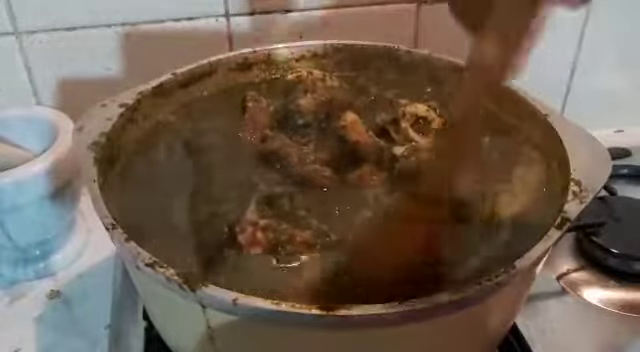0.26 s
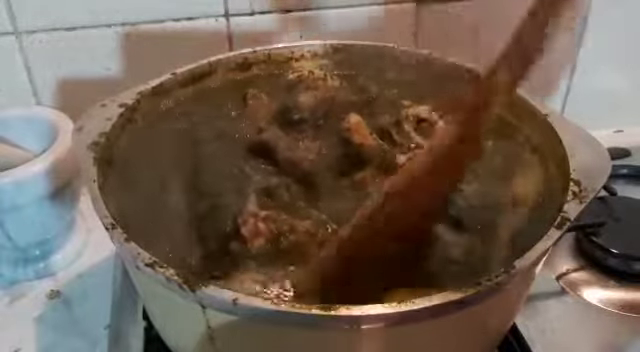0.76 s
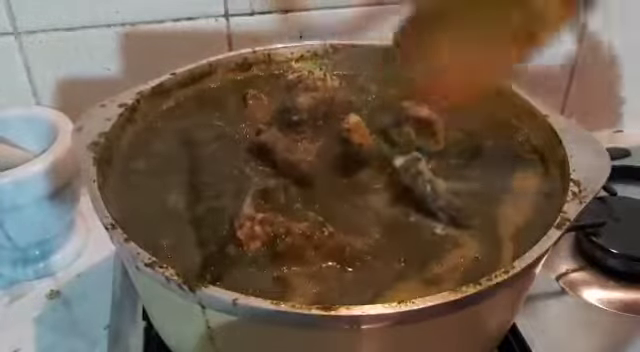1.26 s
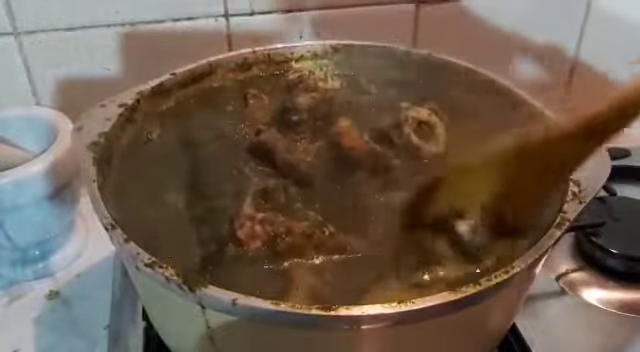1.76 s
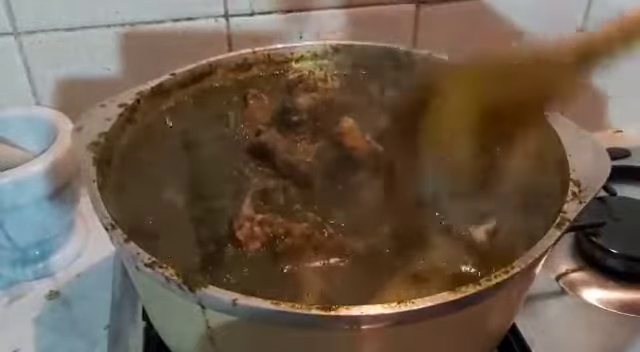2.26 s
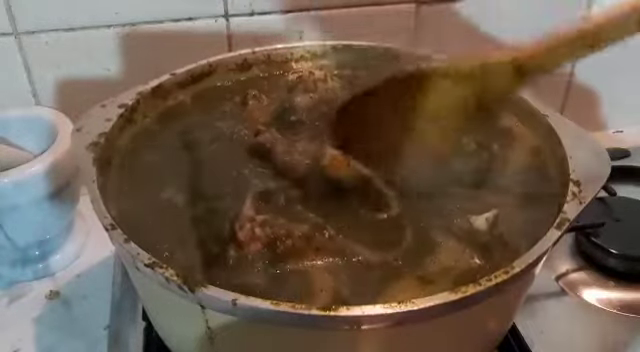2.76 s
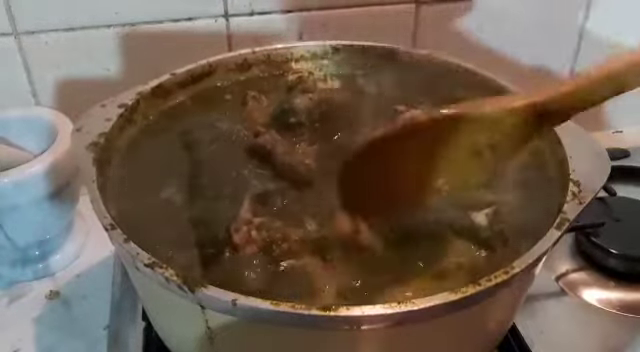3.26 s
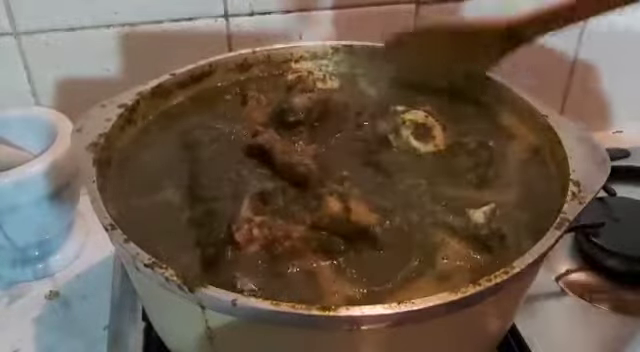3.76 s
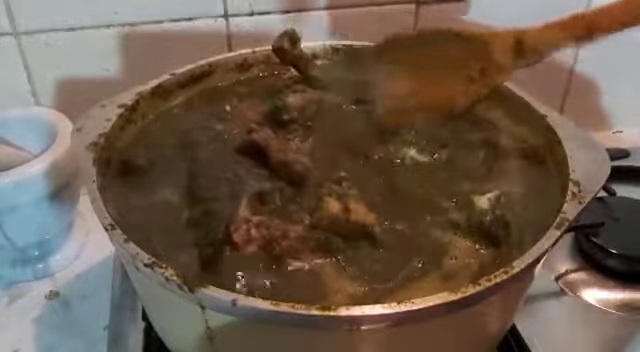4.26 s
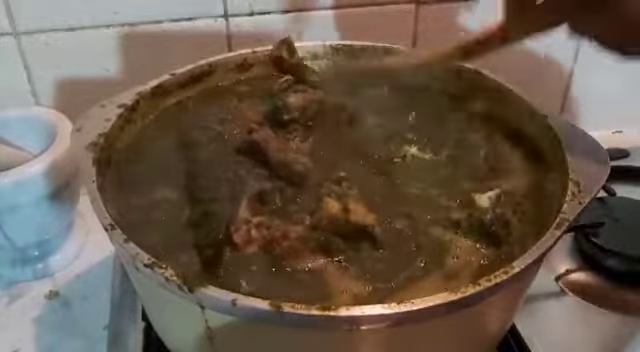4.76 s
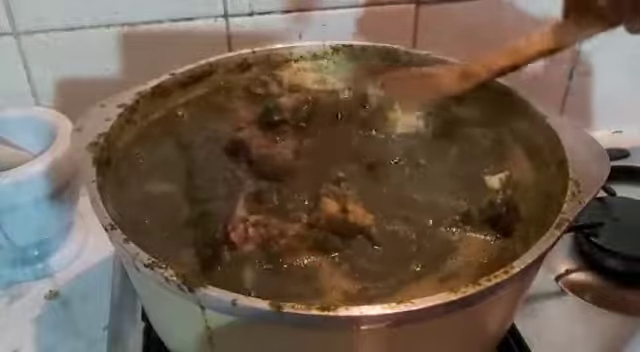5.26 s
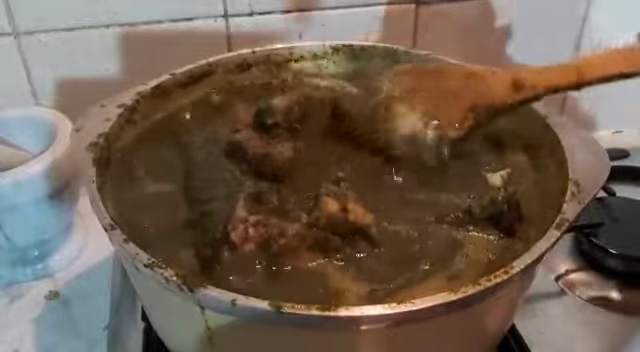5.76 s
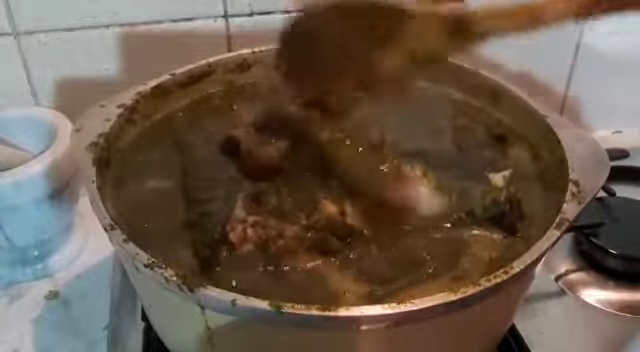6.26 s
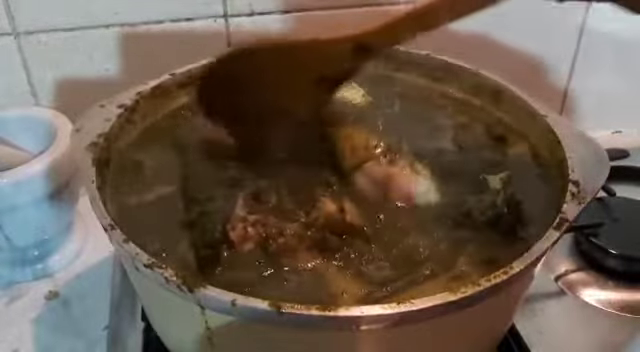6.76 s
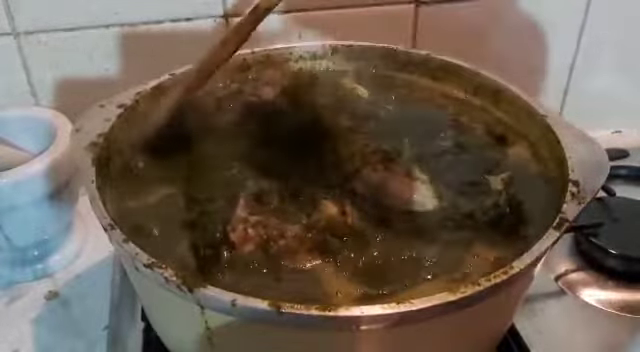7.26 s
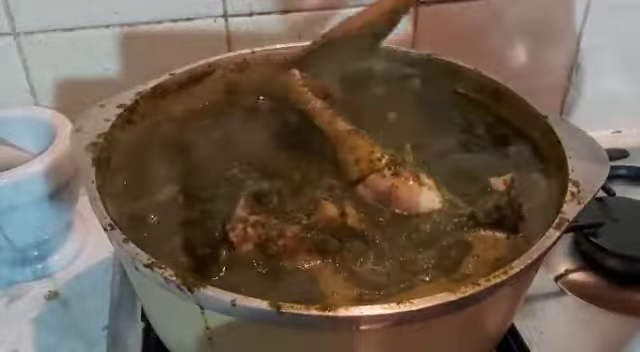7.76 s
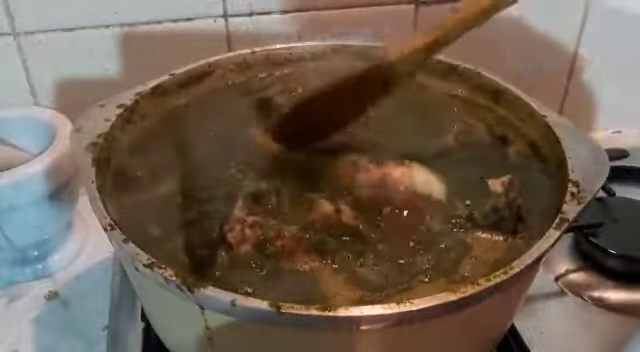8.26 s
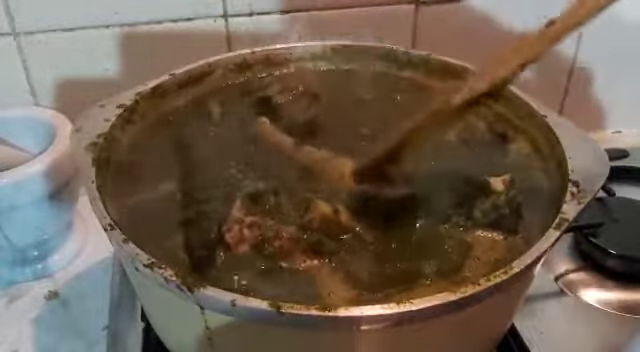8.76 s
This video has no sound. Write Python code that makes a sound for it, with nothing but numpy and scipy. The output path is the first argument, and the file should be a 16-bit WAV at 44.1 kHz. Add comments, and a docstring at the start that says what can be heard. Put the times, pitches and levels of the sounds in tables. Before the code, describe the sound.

Close stereo sound of a large metal pot of thick soup on a gas burner in a small tiled kitchen. Flame roar, jet hiss and fine simmering run throughout. A wooden spoon shifts the meat, bringing scattered plops, a run of them near 2.5 seconds and the loudest wet smack at 4.3. It calms after 5 seconds, then plops and spatter return near 7.4.

```python
"""Close to a big metal pot of thick soup on a gas burner in a tiled kitchen, heard by a left and a right microphone.
From the start to the end, shaped noise makes the flame's roar and the jet's hiss; swarms of tiny rings make the simmer.
A spoon pushes the meat about; near 2.5 s the broth, washing in dense grains, gives a run of plops (damped rings).
The loudest smack (a filtered click) and plop come at 4.3 s; after 5 s it is calmer, with low glugs and droplets.
From 7.4 s to the end smacks, plops and spatter return; the air above the soup rings between the pot walls."""
import sys
import numpy as np
from scipy import signal
from scipy.fft import rfft, irfft, next_fast_len
from scipy.io import wavfile
from scipy.ndimage import map_coordinates

SR = 44100
rng = np.random.default_rng(int(sys.argv[2]) if len(sys.argv) > 2 else 0)


def inscribe(sig):
    """Save sig as 16-bit PCM at rate SR to the path in sys.argv[1].

    A 1-D sig is mono; a 2-D sig holds one channel per row.
    Samples are clipped to [-1, 1] before scaling.
    """
    pcm = np.round(np.clip(np.atleast_2d(sig).T, -1, 1) * 32767)
    wavfile.write(sys.argv[1], SR, pcm.astype(np.int16))


N = 397782
T = np.arange(SR // 6) / SR  # seconds within one short event


def amp(db):
    """Decibels to gain."""
    return 10 ** (np.asarray(db) / 20)


def unit(x):
    """Scaled to rms 1."""
    return x / np.sqrt(np.mean(x ** 2) + 1e-20)


def along(points, hz):
    """(Hz, value) points read on a log frequency axis."""
    f, v = np.transpose(points)
    return np.interp(np.log(hz + 1), np.log(f + 1), v)


def curves(rows):
    """One value per sample for each column after the time."""
    s, *cols = np.transpose(rows)
    return [np.interp(np.arange(N) / SR, s, c) for c in cols]


def wobble(rate):
    """A smooth random curve, rate knots a second."""
    knots = rng.standard_normal(int(N * rate / SR) + 4)
    return map_coordinates(knots, [np.arange(N) * rate / SR])


def filtered(x, response):
    """x times a complex response of frequency."""
    m = next_fast_len(N + SR // 2)
    return irfft(rfft(x, m) * response(np.fft.rfftfreq(m, 1 / SR)), m)[..., :N]


def resonances(modes, f):
    """Causal response of (Hz, width Hz, dB) modes."""
    return sum(amp(db) * 1j * f * w / (c * c - f * f + 1j * f * w) for c, w, db in modes)


def add(track, s, sound):
    """Mix a sound into the track at time s."""
    part = track[max(round(s * SR), 0):][:len(sound)]
    part += sound[:len(part)]


def rush(colour):
    """Stereo noise of rms 1, nearly mono in the bass; sharing mid and side noise sets the likeness."""
    # How alike the two microphones hear it. Each row: frequency in Hz, left-right likeness (1 is mono).
    likeness = [(60, 0.95), (160, 0.95), (300, 0.87), (450, 0.7), (750, 0.14), (1300, 0.12), (2200, 0.07),
                (4400, 1), (7000, 0.23), (11000, 0.067), (14000, 0.067), (15500, 1)]

    def shape(hz):
        turn = np.arccos(np.clip(along(likeness, hz), 0, 1)) / 2
        return colour(hz) * np.array([np.cos(turn), np.sin(turn)])

    mid, side = filtered(rng.standard_normal((2, N)), shape)
    return unit(np.array([mid + side, mid - side]))


def bubble(hz, t60, rise, onset):
    """A pocket of gas rings and climbs in pitch around hz; it swells over onset cycles to peak 1."""
    pitch = hz * (1 + rise * (1 - np.exp(-3 * T / t60)) - rise / 2)
    decay = amp(-60 * T / t60)
    swell = 1 - np.exp(-T * hz / onset)
    ring = np.sin(2 * np.pi * np.cumsum(pitch) / SR) * decay * swell
    return ring / np.abs(ring).max()


def snap(low_hz, high_hz):
    """A liquid film parts: one band-limited click of peak 1."""
    low = signal.butter(3, low_hz, "high", fs=SR, output="sos")
    high = signal.butter(12, min(high_hz, SR / 3), fs=SR, output="sos")
    click = signal.sosfilt(np.vstack([low, high]), 1. * (T == 0))
    return click / np.abs(click).max()


def grains(rate, hz, spread, cycles, scatter_db):
    """A random swarm of tiny damped bubbles, rms 1: rate a second, spread octaves either side of hz."""
    u = rng.random((int(rate * N / SR), 3))
    starts = (u[:, :1] * N).astype(int)
    pitch = hz * 2 ** (spread * (2 * u[:, 1:2] - 1))
    size = amp(scatter_db * np.minimum(-np.log(1 - u[:, 2:]), 3))  # many small, few large
    n = np.arange(SR // 40)
    age = pitch * n / SR  # in cycles
    decay = np.exp(-np.log(1000) * age / cycles)  # down 60 dB after this many cycles
    rings = size * np.sin(2 * np.pi * age) * decay * (1 - np.exp(-2 * age))
    return unit(np.bincount((starts + n).ravel(), rings.ravel(), N)[:N])


def stirring(pushes):
    """Power of the spoon's motion: each push swells and fades as a bell."""
    t = np.arange(N) / SR
    return sum(amp(db) ** 2 * np.exp(-np.pi * (2 * (t - s) / length) ** 2 / 2) for s, length, db in pushes)


def placed(x, lead_s):
    """The sound reaches the left microphone first, by lead_s seconds."""
    return filtered(x, lambda hz: np.exp(1j * np.pi * hz * lead_s * np.array([[1], [-1]])))


def kitchen(x, wall_db, wall_t60, room_db):
    """Direct sound, a quick scatter from hob and tiles, and a room tail, as decaying noise redrawn each quarter second."""
    # Decay of the tiled room. Each row: frequency in Hz, time to fall 60 dB in seconds.
    room_t60 = [(150, 0.097), (1200, 0.14), (4000, 0.2), (12000, 0.0016)]
    out = np.zeros((2, N + SR))
    hop = SR // 4
    for start in range(0, N, hop):
        hz, t, z = signal.stft(rng.standard_normal((2, 2, SR // 3)), SR, nperseg=128)
        near = signal.istft(z[0] * amp(-60 * t / wall_t60), nperseg=128)[1]
        far = signal.istft(z[1] * amp(-60 * t / along(room_t60, hz)[:, None]), nperseg=128)[1]
        near = near + near[::-1] / 2  # near walls reach both microphones much alike
        scatter = amp(wall_db) * near / np.linalg.norm(near[0])
        tail = scatter + amp(room_db) * far / np.linalg.norm(far[0])
        echo = signal.fftconvolve(x[None, start:start + hop], tail, axes=1)
        out[:, start + SR // 300:][:, :echo.shape[1]] += echo
    return x + out[:, :N]


def pot(x, ring_db):
    """The air between the pot walls rings on as damped modes; hob and tiles throw the sound back."""
    # Air above the soup. Each row: frequency in Hz, width in Hz, level in dB relative to ring_db.
    air_modes = [(310, 39, -17), (674.6, 15, 15), (742, 14, 6.5), (899, 55, 6.5), (1098, 36, 7.5),
                 (1266, 260, 1.5), (1467, 64, -3.5)]
    # Reflections from the hob and the tiled wall. Each row: delay in seconds, level in dB.
    reflections = [(.0034, -18), (.0084, -21.5)]

    def response(f):
        ringing = 1 + amp(ring_db) * resonances(air_modes, f)
        echoes = 1 + sum(amp(db) * np.exp(-2j * np.pi * f * delay) for delay, db in reflections)
        return ringing * echoes

    return filtered(x, response)


def burner():
    """The flame roars under the pot; gas hisses and whistles unsteadily through the jet: all shaped noise."""
    # Colour of the flame's roar. Each row: frequency in Hz, relative density in dB per Hz.
    roar_colour = [(100, -9.5), (132, 0.5), (185, -5.5), (250, -1.5), (310, 3), (375, -0.5), (440, -9.5),
                   (520, -11), (640, -30), (1000, -16), (2000, -24), (3000, -86)]
    # Gas rushing out of the jet. Each row: frequency in Hz, relative density in dB per Hz.
    hiss_colour = [(1800, -30), (2500, -14.5), (3250, -15), (4300, 0.5), (4900, -0.5), (5600, -10),
                   (6900, 2), (8400, -8), (9100, -5.5), (9800, -10.5), (10500, -4), (11100, -10),
                   (13000, -10), (13400, 0), (14300, -6.5), (15800, 2)]
    # Resonances of the gas jet. Each row: frequency in Hz, width in Hz, relative level in dB.
    nozzle_modes = [(6900, 420, 8), (7005, 60, 8), (7295, 60, 2), (7604, 70, 1), (13838, 110, 10)]
    # Ragged top of the jet's sound. Each row: frequency in Hz, relative density in dB per Hz.
    whistle_colour = [(14300, -30), (15000, -13), (15350, -6), (15580, 0), (15750, -6), (15900, -20)]
    # Course of the whistle. Each row: time in seconds, level in dB before its wobble.
    whistle_course = [(0.0, -59.5), (2.6, -56), (2.7, -61), (4.8, -55), (6.2, -59), (8.25, -56.5),
                      (8.35, -58), (9.02, -56)]
    roar_db, hiss_db = -50.7, -50.5  # middle levels, around which they wobble
    whistle_db, = curves(whistle_course)
    roar = amp(roar_db + 1.3 * wobble(5)) * rush(lambda hz: amp(along(roar_colour, hz)))

    def jet(hz):
        return np.hypot(amp(along(hiss_colour, hz)), abs(resonances(nozzle_modes, hz)))

    hiss = amp(hiss_db + 1.14 * wobble(40)) * rush(jet)
    whistle = amp(whistle_db + 1.4 * wobble(31)) * rush(lambda hz: amp(along(whistle_colour, hz)))
    return roar + placed(hiss, lead_s=.00005) + placed(whistle, lead_s=.000008)


def simmer():
    """Small bubbles keep breaking all over the soup, louder where the spoon stirs; the mass gurgles and heaves."""
    # Pushes of the spoon. Each row: height of the push in seconds, length in seconds, strength in dB.
    strokes = [(0.472, 0.34, -7.5), (0.79, 0.21, 0.5), (1.107, 0.25, 0.5), (1.392, 0.037, -2), (2.0, 1, -4),
               (2.554, 0.68, 2.5), (2.948, 0.56, -1.5), (3.4, 0.29, -1), (3.87, 0.18, 5), (4.113, 0.056, 1),
               (4.34, 0.18, 4), (4.763, 0.19, 2.5), (4.99, 0.065, 0), (6.224, 0.18, -18), (8.18, 0.38, 0)]
    # Colour of the froth. Each row: frequency in Hz, relative density in dB per Hz.
    froth_colour = [(300, -38), (450, -1.5), (520, -4.5), (600, -12), (668, 7), (720, -14), (790, 3.5),
                    (940, -13), (1030, -9), (1090, 1), (1150, -6.5), (1470, 4), (1670, -14), (1890, 3),
                    (2600, -7.5), (3300, -15)]
    # Colour of the low heaving. Each row: frequency in Hz, relative density in dB per Hz.
    heave_colour = [(13, -60), (24, -31), (40, -23), (59, 7), (102, 2), (135, 6.5), (194, -9), (220, -7.5),
                    (290, 3), (480, -120)]
    # Gains in dB ahead of the layer mix: soup left alone, and added by a push of 0 dB
    simmer_rest_db, simmer_push_db = -56, -57
    heave_rest_db, heave_push_db = -59, -50.5
    settle_db_per_s = 0.14  # the soup left alone slowly calms
    push = np.sqrt(stirring(strokes))
    resting = amp(simmer_rest_db - settle_db_per_s * np.arange(N) / SR)
    bubbling = np.hypot(resting, amp(simmer_push_db) * push)
    heaving = np.hypot(amp(heave_rest_db + 0.36 * wobble(3.4)), amp(heave_push_db) * push)

    swarm = pot(grains(rate=210, hz=962, spread=0.97, cycles=10.0, scatter_db=3.5), ring_db=-1.5)
    swarm = filtered(swarm, lambda hz: amp(along([(500, 4.5), (1000, 0.0), (1900, 10.0), (2700, -44)], hz)))
    swarm = unit(kitchen(swarm, wall_db=-2, wall_t60=0.04, room_db=-3))
    # middle-sized bubbles
    blips = grains(rate=50, hz=940, spread=0.83, cycles=16.0, scatter_db=0.0)
    blips = unit(kitchen(blips, wall_db=-5, wall_t60=0.05, room_db=-7))
    gurgle = grains(rate=70, hz=222, spread=0.84, cycles=6, scatter_db=2.5)
    gurgle = unit(kitchen(gurgle, wall_db=-6, wall_t60=0.026, room_db=-20))
    froth = rush(lambda hz: amp(along(froth_colour, hz)))
    heave = rush(lambda hz: amp(along(heave_colour, hz)))

    surface = amp(-3.8) * swarm + amp(-7.5) * blips + amp(-1.2) * froth
    depths = amp(-3.5) * heave + amp(-5.0) * gurgle
    return bubbling * surface + heaving * depths


def slosh():
    """Broth runs round the spoon as a dense wash of small bubbles."""
    # Washes round the spoon. Each row: height of the wash in seconds, length in seconds, rms level in dB.
    washes = [(2.3, 0.28, -59.5), (2.53, 0.19, -52.5), (2.71, 0.15, -52.5), (3.42, 0.05, -54),
              (6.19, 0.16, -61), (7.478, 0.028, -48.5), (7.672, 0.035, -49), (8.15, 0.067, -48),
              (8.24, 0.06, -65)]
    # Filter on the wash. Each row: frequency in Hz, relative gain in dB.
    wash_colour = [(350, -31), (520, 3.5), (600, -28), (675, -1.5), (740, 2), (860, 6), (1000, 4),
                   (1100, -3), (1300, -14), (2000, -28)]
    wash = grains(rate=600, hz=800, spread=0.75, cycles=14, scatter_db=1.5)
    wash = filtered(wash, lambda hz: amp(along(wash_colour, hz)))
    return np.sqrt(stirring(washes)) * unit(kitchen(wash, wall_db=-7, wall_t60=0.05, room_db=-9))


def spits():
    """Droplets crack, ping for a moment and shed finer spray, over a faint random ticking of bursting froth."""
    # The larger droplets. Each row: start in seconds, level in dB ahead of the filter, pitch in Hz,
    # broad crack in dB relative to that level.
    droplets = [(0.107, -39, 4200, -8), (0.116, -41.5, 4770, 1), (0.345, -42, 7200, -8),
                (1.119, -42, 4130, -10), (1.389, -59, 4440, -6), (1.662, -45, 4900, -11),
                (2.279, -46, 4300, -4), (1.905, -46.5, 3820, 0), (2.564, -46.5, 3800, -1.5),
                (2.711, -47, 4500, -5), (2.936, -50, 4130, -9), (3.042, -47, 3720, -7),
                (3.114, -44, 4260, -12), (3.147, -45, 8050, -9), (3.345, -39.5, 6200, -6),
                (3.365, -52, 3720, -1), (4.192, -53, 7000, -15), (4.523, -54, 3760, 5),
                (4.917, -47, 5440, -13), (5.23, -56, 4240, 3), (5.881, -45, 4320, -6),
                (6.094, -48, 4930, -8), (6.233, -54, 4330, 3), (6.897, -45.5, 4400, -5),
                (7.337, -40, 7000, -18), (7.451, -43, 7650, -1.5), (7.469, -45, 4200, -2),
                (7.654, -50, 4000, -8), (7.694, -48, 4100, -8), (7.787, -49, 2900, -13),
                (7.946, -46, 2440, -2), (7.962, -48.5, 2600, -3), (8.106, -45, 5260, -18),
                (8.184, -44, 2720, 0), (8.358, -45, 6960, -7), (8.608, -40.5, 3520, -0.5)]
    out = np.zeros(N)
    crack_s, spray_s, spray_db = .0011, .009, -17  # decay constants in seconds; spray relative to crack
    for s, db, hz, crack_db in droplets:
        fading = amp(crack_db) * (np.exp(-T / crack_s) + amp(spray_db) * np.exp(-T / spray_s))
        crack = fading * rng.standard_normal(len(T))
        ping = amp(-2.5) * bubble(hz, t60=0.0056, rise=0.049, onset=0.69)
        add(out, s, amp(db) * (crack + ping))
    colour = [(900, 12.5), (2200, 10.5), (4500, 7.5), (8000, 11), (15000, -2)]  # (Hz, dB)
    drops = filtered(out, lambda hz: amp(along(colour, hz)))
    ticking = grains(rate=86, hz=5000, spread=.5, cycles=14, scatter_db=2.5)
    return drops + amp(-66.5) * ticking


def glugs():
    """Big steam pockets swell and ring low under the surface, the larger the longer."""
    # Large pockets deep in the soup. Each row: start in seconds, relative level in dB, pitch in Hz.
    pockets = [(0.55, -38, 288), (0.741, -37.5, 332), (1.049, -44, 310), (1.075, -39, 76.4),
               (1.128, -47, 72.5), (1.16, -42, 131), (2.153, -38, 330), (2.484, -40, 310),
               (2.501, -43, 242), (2.556, -37, 142), (2.906, -38.5, 310), (3.333, -40, 142),
               (3.379, -46, 310), (3.41, -40, 372), (3.454, -42.5, 150), (3.748, -35, 475),
               (3.868, -37, 320), (4.245, -37, 250), (4.764, -38, 235), (5.546, -36.5, 340),
               (5.625, -48, 325), (5.681, -41, 243), (5.746, -39.5, 335), (5.97, -45, 330),
               (6.191, -37.5, 380), (6.265, -41.5, 300), (6.799, -34, 325), (7.206, -41, 240),
               (7.244, -38, 245), (7.476, -51, 378), (7.654, -39, 314), (7.673, -42, 265),
               (8.159, -40.5, 135), (8.216, -38, 310), (8.257, -40, 327), (8.396, -42.5, 295)]
    ring_cycles = 18.6  # cycles until a pocket has rung out
    out = np.zeros(N)
    for s, db, hz in pockets:
        add(out, s, amp(db - 1.5) * bubble(hz, t60=ring_cycles / hz, rise=0.02, onset=1.0))
    return out


def smacks():
    """Thick broth parts with a dull click, the brief ring of the opened pocket and a low shove of air."""
    # Wet smacks of spoon, meat and broth. Each row: start in seconds, click level in dB, lower edge in Hz,
    # upper edge in Hz, low shove of air in dB relative to the click.
    partings = [(0.107, -31.5, 940, 1930, -16), (0.1155, -30.5, 910, 1830, -25),
                (2.556, -31.5, 800, 1480, -6), (2.56, -28.5, 900, 2400, -15), (2.708, -30, 900, 2100, -20),
                (3.069, -39, 1600, 2200, -18), (3.346, -34.5, 900, 3000, -18),
                (3.363, -38, 1000, 3500, -12), (3.7464, -25, 450, 2530, -13),
                (4.3194, -15, 870, 2080, -12.5), (4.7628, -30.5, 695, 1730, -3.5),
                (6.912, -40.5, 1300, 2520, -14), (7.4574, -38.5, 500, 826, -20),
                (7.4664, -26.5, 734, 2500, -24), (7.6605, -30.5, 650, 2400, -8.5),
                (8.159, -35, 600, 2410, -21), (8.357, -38, 900, 2290, -11), (8.367, -38, 900, 2220, -14),
                (8.6036, -30.5, 750, 2220, -25)]
    out = np.zeros(N)
    for s, db, low_hz, high_hz, shove_db in partings:
        add(out, s, amp(db) * snap(low_hz, high_hz))
        add(out, s + 0.00078, amp(db - 11) * bubble(0.785 * high_hz, t60=0.0044, rise=0.033, onset=0.33))
        add(out, s + 0.0015, amp(db + shove_db) * bubble(hz=318, t60=0.026, rise=0.14, onset=0.75))
    return out


def plops():
    """Each bubble tears its film, rings briefly and shoves the air in the pot."""
    # Bubbles opening at the surface. Each row: start in seconds, reference level in dB, pitch in Hz,
    # ring time to fall 60 dB in seconds, tear of the film in dB and low shove of air in dB,
    # both relative to the reference level.
    openings = [(0.739, -35.5, 620, 0.014, -1.5, -11), (0.771, -26, 1150, 0.0068, -14, -19),
                (0.9148, -29.5, 1620, 0.018, -6, -11), (1.056, -37.5, 674, 0.019, -10, -2),
                (1.062, -39, 960, 0.017, -7, -8), (1.112, -38.5, 696, 0.01, -18, -20),
                (1.5943, -20.5, 1220, 0.011, -31, -29), (1.713, -40, 1080, 0.016, -1, -3),
                (1.731, -33.5, 1150, 0.011, -4, -15), (1.903, -54, 700, 0.015, 7, -12),
                (2.016, -41, 1174, 0.027, -14, 1), (2.084, -41, 900, 0.014, -10, -12),
                (2.135, -46.5, 1060, .018, -5, 6.5), (2.236, -47, 813, .02, -12, -12),
                (2.313, -43, 810, 0.019, -12, -12), (2.353, -45, 832, .018, -10, -6),
                (2.384, -38.5, 1060, .018, -7, -15), (2.431, -42, 830, .022, -10, -19),
                (2.482, -45, 940, .018, -7, 10.5), (2.501, -36, 716, 0.018, -11, -4),
                (2.547, -32, 833, 0.032, -18, -10), (2.645, -44, 960, 0.019, -10, -15),
                (2.681, -37, 760, .02, -14, -9), (2.706, -37, 890, 0.022, -14, -15),
                (2.736, -40.5, 700, 0.028, -10, -2), (2.8063, -21, 975, 0.013, -4, -13),
                (3.069, -26, 753, 0.019, -6, -11), (3.335, -33.5, 890, 0.014, -3, -10),
                (3.3412, -30.5, 1200, .014, -11, -5), (3.35, -45, 720, 0.0086, -10, -10),
                (3.415, -42, 690, .018, -8, -8), (3.428, -35, 910, 0.012, -9, -5),
                (3.432, -48, 1010, .01, -10, -15), (3.487, -35, 654, 0.0085, -8, -9),
                (3.809, -44, 1350, .01, -6, -9), (3.871, -39, 774, .014, -14, -15),
                (3.879, -27, 1460, .011, -8, -13), (4.211, -38, 1050, 0.013, -15, -15),
                (4.248, -31.5, 643, 0.03, -17, -2), (4.3212, -16, 1610, 0.011, -20, -25),
                (4.7643, -22, 1220, 0.017, -12, -19), (5.234, -40, 1220, 0.0083, 2, -19),
                (5.586, -42, 920, 0.018, -3, -14), (5.866, -43, 880, 0.016, -8, -12),
                (5.963, -43, 470, .025, -8, -12), (6.135, -41, 734, 0.025, -14, -20),
                (6.149, -40, 770, 0.017, -9, -12), (6.199, -40, 630, 0.016, -9, -13),
                (6.214, -46, 1140, 0.016, -10, -19), (6.307, -36.5, 820, 0.015, -12, -12),
                (7.4668, -30, 1240, 0.0099, -12, -18), (7.6599, -26, 1170, 0.0058, -18, -12),
                (8.1221, -24, 867, 0.015, -14, -9.5), (8.15, -44, 980, 0.014, -9, -7),
                (8.231, -41, 640, 0.014, -5, -1), (8.3135, -34.5, 610, 0.0099, -13, -25),
                (8.351, -36, 900, 0.015, -16, -16), (8.548, -32, 899, 0.014, -14, -30)]
    out = np.zeros(N)
    for s, db, hz, t60, tear_db, shove_db in openings:
        add(out, s + 0.00029, amp(db - 5.5) * bubble(hz, t60, rise=0.029, onset=.7))
        add(out, s - .0004, amp(db + tear_db) * snap(0.46 * hz, 1100 + 0.41 * hz))
        add(out, s, amp(db + shove_db) * bubble(hz=268.5, t60=0.021, rise=0.088, onset=1.0))
    return out


def scene():
    """The pot stands slightly nearer to the left microphone; droplets fly up closer to the middle."""
    soup = placed(simmer() + slosh(), lead_s=.00009)
    spatter = kitchen(spits(), wall_db=-4, wall_t60=.04, room_db=-10)
    bursts = pot(plops() + smacks(), ring_db=-4.5) + glugs()
    bursts = kitchen(bursts, wall_db=-10.5, wall_t60=0.06, room_db=-9)
    near = placed(bursts, lead_s=.00008) + placed(spatter, lead_s=.00007)
    return burner() + soup + near


def record(dry):
    """The two microphones differ a little in colour; nothing is kept above the band limit."""
    # Balance of the pair. Each row: frequency in Hz, left minus right in dB.
    balance = [(60, 1.5), (92, -4), (140, -1), (210, -2), (330, -4), (500, -7.5), (770, 1.5), (1170, -3.5),
               (1790, 1.5), (2740, -3), (4190, 3.5), (6410, -1), (9810, -1.0), (15000, 2.5)]
    top_hz = 15760
    halves = np.array([[.5], [-.5]])  # left gets half the difference, right the opposite half
    return filtered(dry, lambda hz: amp(along(balance, hz) * halves) * (hz < top_hz))


dry = scene()
out = record(dry)
inscribe(out)
```